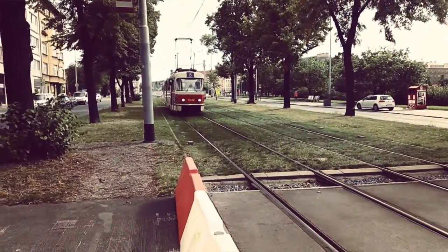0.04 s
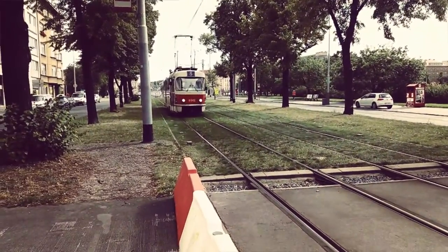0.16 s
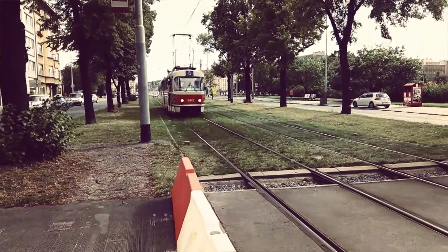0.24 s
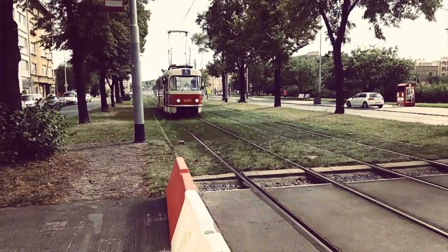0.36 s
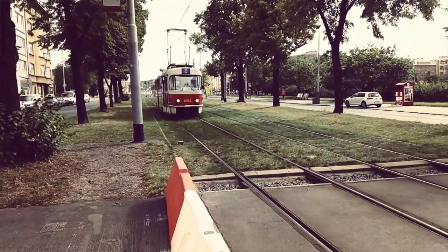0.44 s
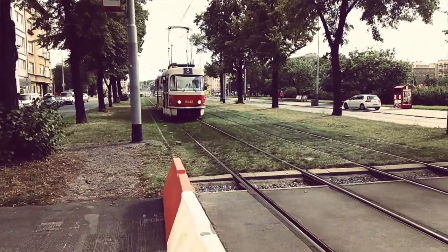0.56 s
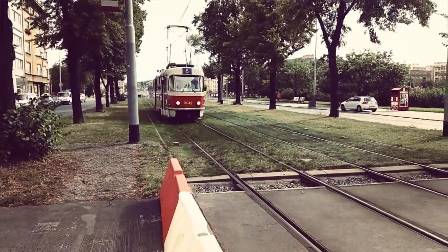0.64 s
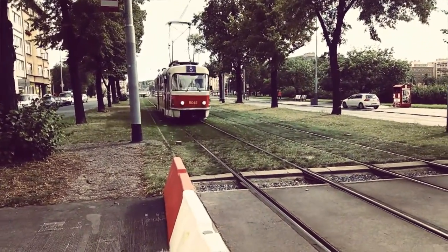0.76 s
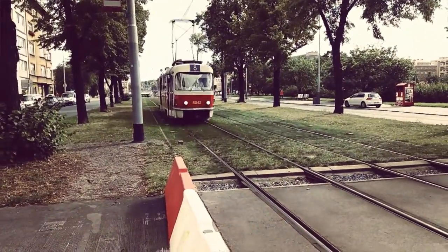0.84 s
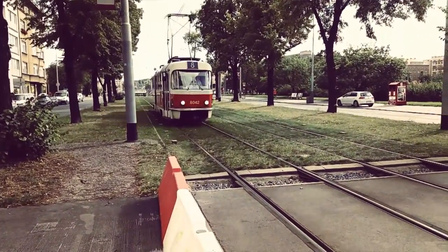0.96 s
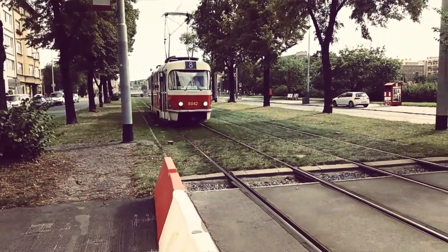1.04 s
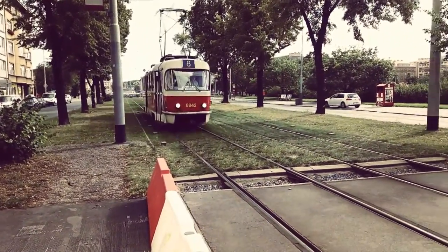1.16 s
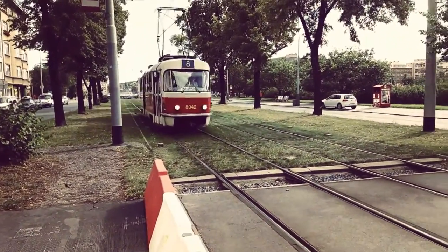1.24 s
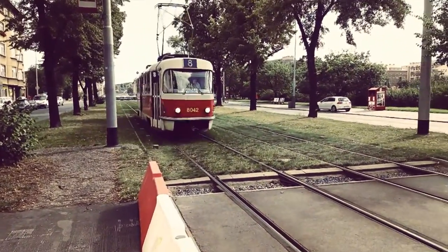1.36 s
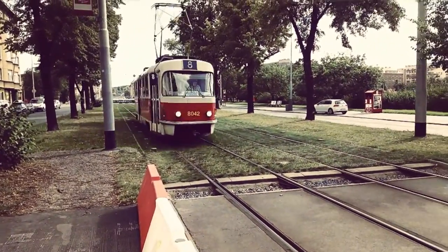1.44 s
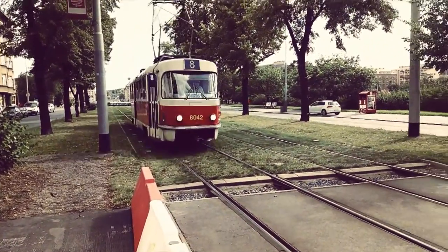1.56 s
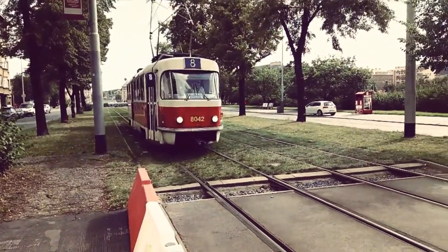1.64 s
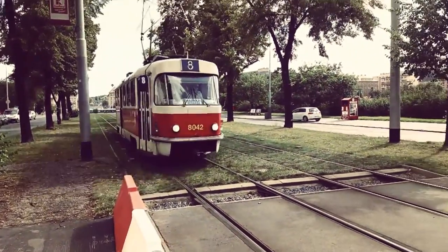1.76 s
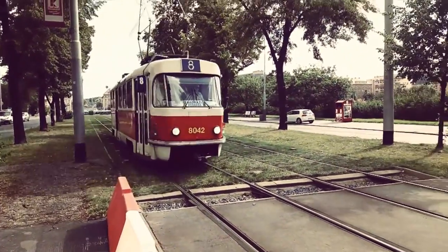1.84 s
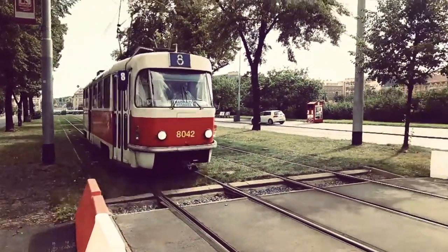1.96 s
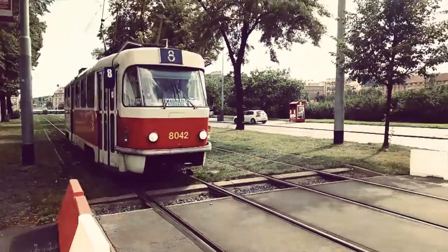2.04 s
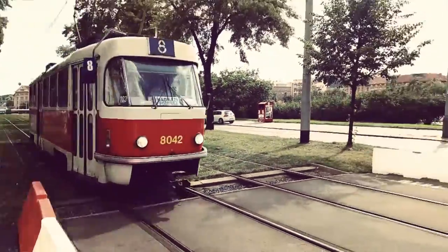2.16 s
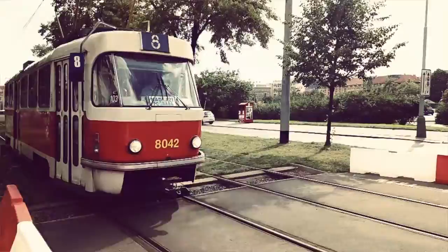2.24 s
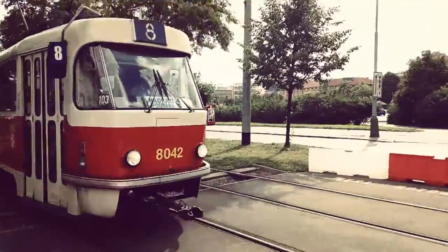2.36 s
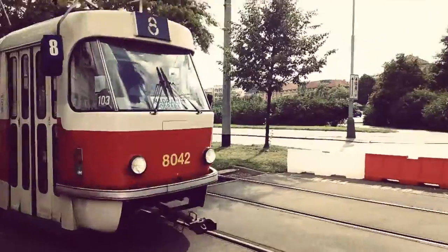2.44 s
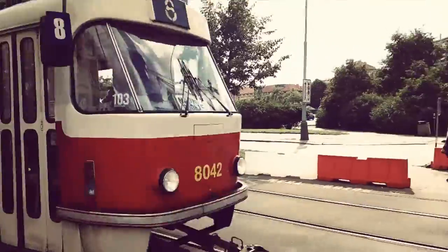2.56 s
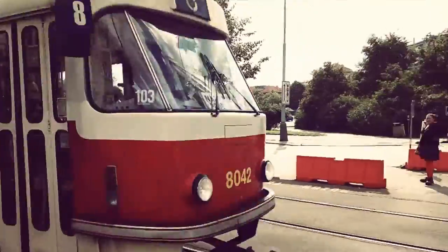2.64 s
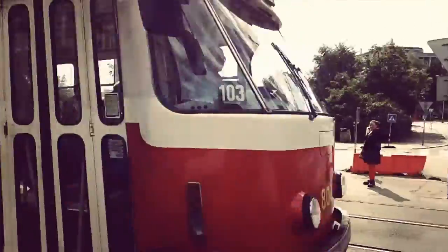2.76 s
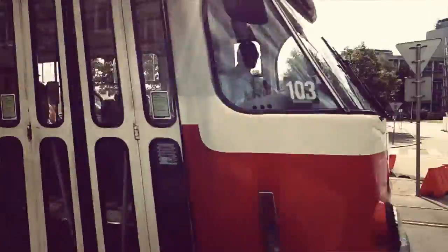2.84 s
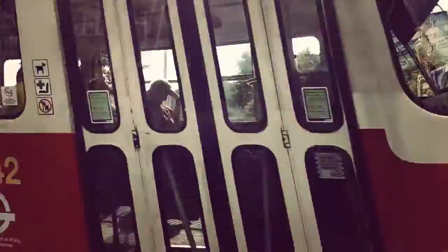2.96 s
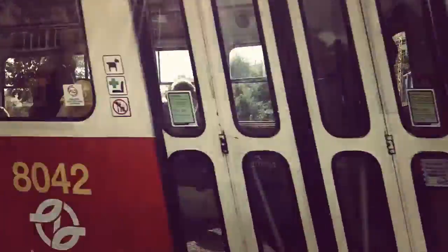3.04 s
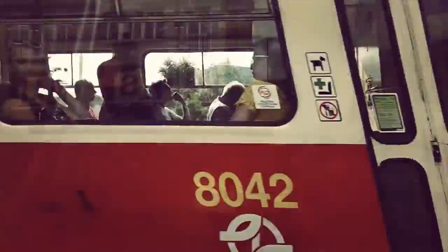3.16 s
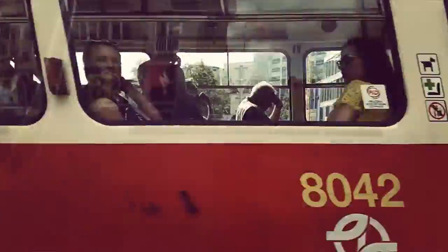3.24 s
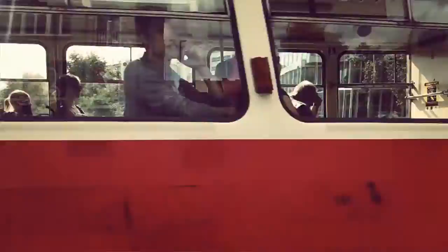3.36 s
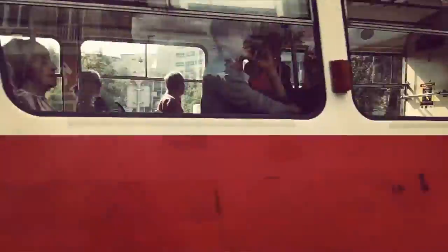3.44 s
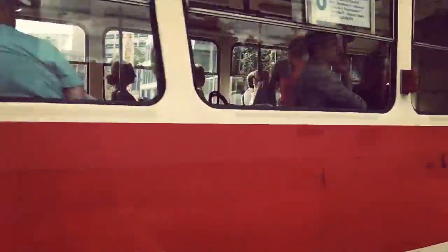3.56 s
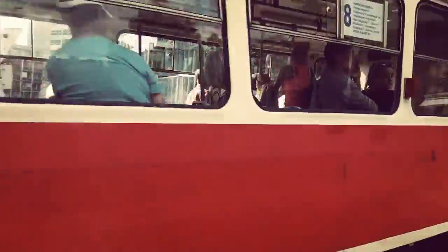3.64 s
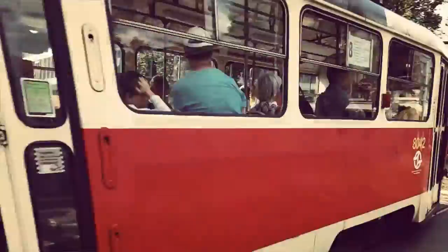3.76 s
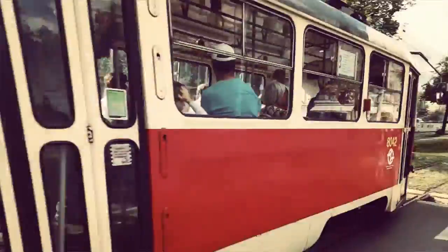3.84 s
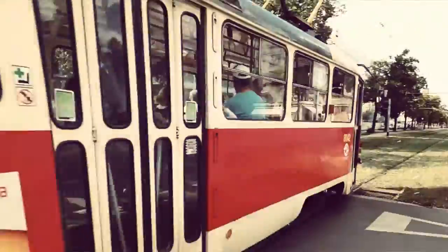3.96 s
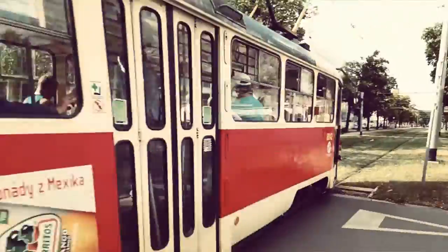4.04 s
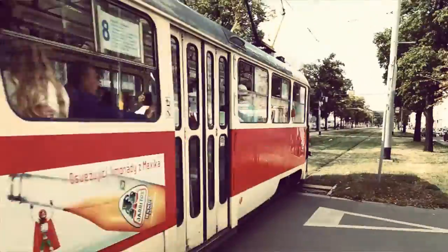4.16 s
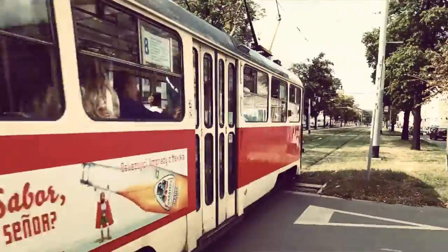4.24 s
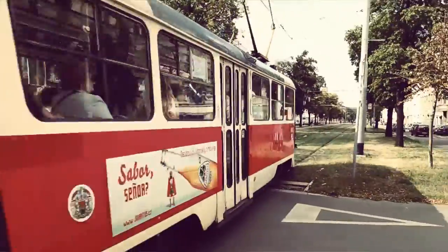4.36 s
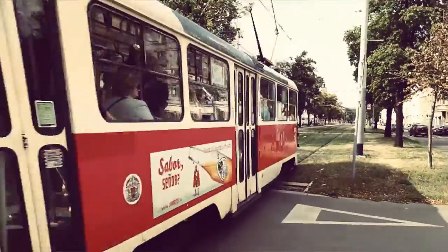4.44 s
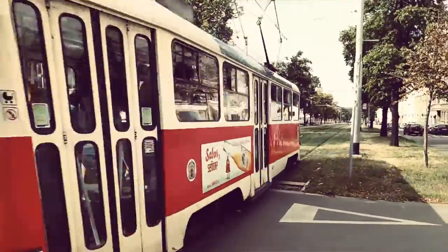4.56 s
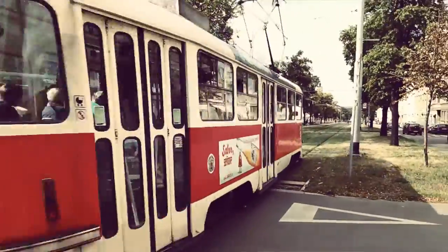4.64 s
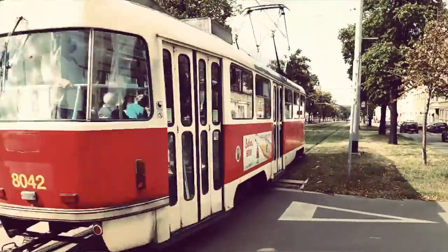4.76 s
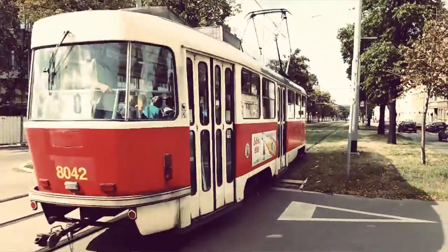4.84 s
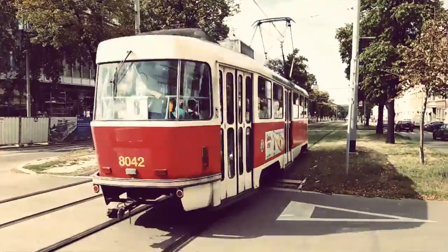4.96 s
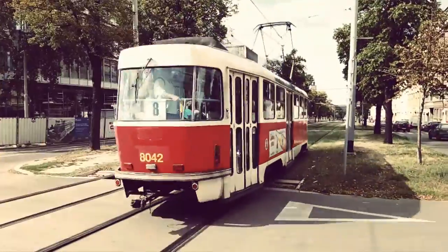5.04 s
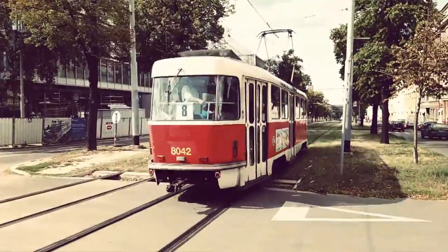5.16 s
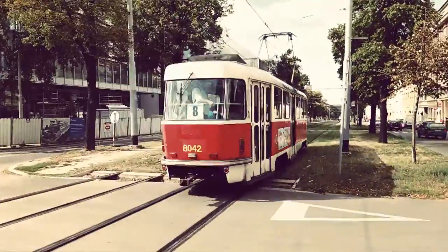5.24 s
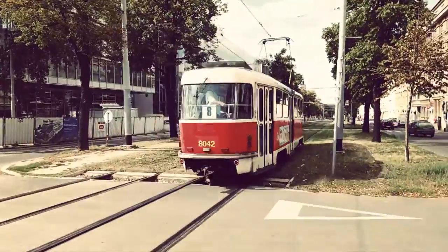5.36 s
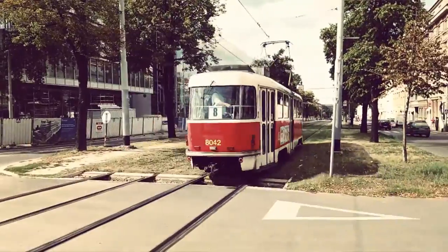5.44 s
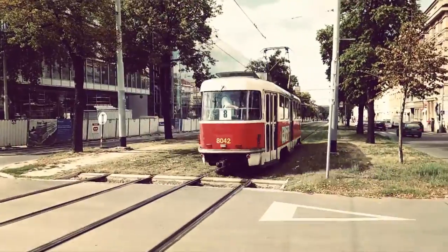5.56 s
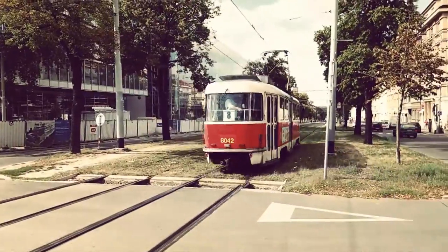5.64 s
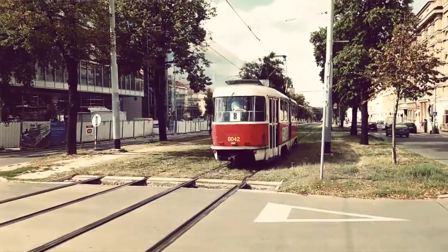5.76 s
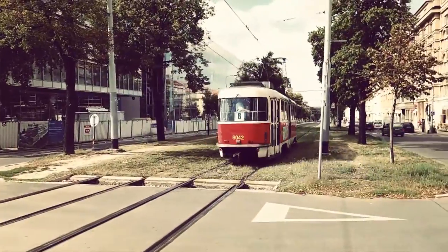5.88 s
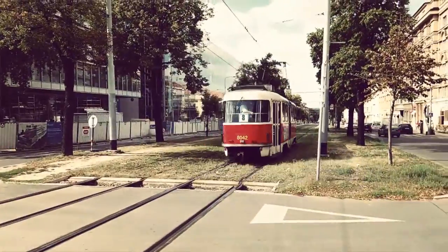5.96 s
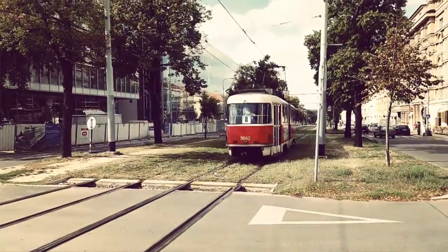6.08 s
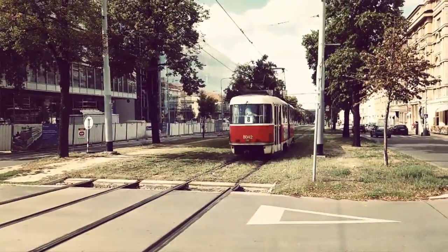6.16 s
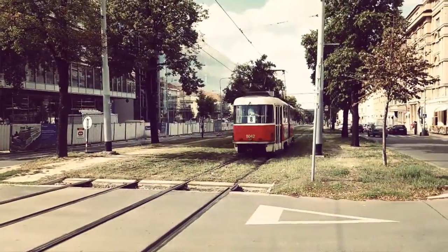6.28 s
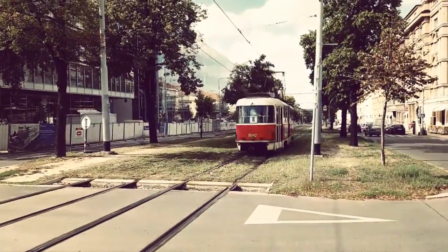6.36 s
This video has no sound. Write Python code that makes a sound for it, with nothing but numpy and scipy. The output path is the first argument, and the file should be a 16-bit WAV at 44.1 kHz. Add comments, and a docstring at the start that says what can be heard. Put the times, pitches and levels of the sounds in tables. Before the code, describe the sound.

Outdoors beside a street tram crossing, wind thumps a bare microphone over low street noise. A car's tyre hiss rises briefly and draws off. A tram emerges, becomes louder abruptly as it meets the paving, and passes very close with deep rumble, drumming slabs, wavering rail whine and thin wheel squeals. It rolls away, muffled by grass, under heavy wind buffeting.

```python
"""A tram rolls over a paved crossing right beside the microphone and away along grass track.
Noise drives the narrow ringing bands of its body, slabs, rails and wheels; coloured noise makes it roll.
Wind buffets the bare microphone in low thumps, built from short pressure swings.
A car fades on the street behind: tyre noise with a road echo, two rising bands and a tread hum.
Brief wheel squeals, a whine spot, broader hisses and steady street noise are random spectra."""
import sys
import numpy as np
from scipy import signal
from scipy.io import wavfile
from scipy.ndimage import uniform_filter1d

SR = 44100
rng = np.random.default_rng(int(sys.argv[2]) if len(sys.argv) > 2 else 0)


def file_out(sig):
    """Save sig as 16-bit WAV at sys.argv[1]."""
    # one column per channel
    cols = np.atleast_2d(sig).T
    # limit, then scale
    lim = np.clip(cols, -1, 1)
    pcm = np.round(lim * 32767).astype(np.int16)
    wavfile.write(sys.argv[1], SR, pcm)


def rack_gain(trim_db):
    """Turn a fader trim in dB into the linear factor to multiply a signal by."""
    fader = np.asarray(trim_db, float)
    return 10 ** (fader / 20)


N = 282725
TIME_S = np.arange(N) / SR

# Ringing of body, slabs and wheels, before any pitch shift: (frequency [Hz], width [Hz], level [dB])
BODY_MODES = [(127.5, 34, -4), (236, 65, 2), (344, 160, 0)]
SLAB_MODES = [(729.3, 245, 4.5), (870.3, 208, 5.5), (979, 32, -12.5), (1371, 180, -11)]
FRONT_WHEEL_MODES = [(3110, 220, -7), (4240, 200, -3), (4840, 160, -11), (5150, 150, -2), (6090, 130, -11)]
REAR_WHEEL_MODES = [(3185, 130, -3), (4450, 170, -13), (5460, 190, -5), (6600, 150, -12), (7660, 150, -22)]
# Ringing of the rails, all moved together by the wander below: (frequency [Hz], width [Hz], level [dB])
RAIL_MODES = [(1740, 79, 0.5), (1740, 206, -3), (1998, 170, -10.5), (2197, 470, -9)]
# The strongest rail mode wanders: (time [s], frequency [Hz])
WHINE_WANDER = [(2.3, 1775), (2.7, 1765), (3.0, 1725), (3.2, 1765), (3.36, 1690), (3.5, 1755), (3.62, 1730),
                (3.85, 1715), (4.0, 1710), (4.15, 1725), (4.35, 1749), (4.5, 1700), (4.85, 1715),
                (5.15, 1700), (5.6, 1685)]
# The rail sings out: (time [s], level change [dB], half length [s])
RAIL_SINGS = [(2.68, 1, 0.12), (3.205, 7, 0.033), (3.474, 3.5, 0.13), (4.144, 5.5, 0.035),
              (4.175, 6.5, 0.0048), (4.34, 5, 0.044), (4.832, 1.5, 0.031)]
# The whine sinks for a while: (time [s], level change [dB], half length [s])
WHINE_LULLS = [(2.048, -8.5, 0.44), (3.143, -4, 0.024), (4.167, -13, 0.007), (4.235, -6, 0.014),
               (4.707, -9, 0.021), (5.302, -0.5, 0.12), (2.3, -2, 0.1)]
# The rumble swells and dips: (time [s], level change [dB], half length [s])
RUMBLE_BOOMS = [(3.053, 3.5, 0.25), (4.08, 2, 0.055), (4.356, -5.5, 0.072), (4.68, 7, 0.12),
                (5.21, -2, 0.34)]
# Wheel ringing swells: (time [s], peak level [dB], rise [dB/s], fall [dB/s])
FRONT_WHEEL_SWELLS = [(3.17, -43, 23.5, 15.5), (4.3, -45.5, 29.5, 61), (1.2, -62, 22, 1.5)]
REAR_WHEEL_SWELLS = [(3.5, -42.5, 28, 4.4), (4.9, -52, 11, 21)]
# Colour of the rolling noise: (frequency [Hz], relative level per Hz [dB])
ROLLING_COLOUR = [(24, -51), (40, -29.5), (63, -13.5), (171, -4.5), (223, -0.5), (345, -1), (559, -12.5),
                  (844, -13.5), (1240, -14), (1550, -13.5), (1740, -5.5), (2830, -30), (6760, -36),
                  (13000, -69)]
# Front and rear bogie pass the microphone: one time each [s]
BOGIE_PASS_S = [3.573, 4.293]
# Loudness of each tram layer: (front bogie when nearest [dB], rear bogie when nearest [dB],
# loss per tenfold distance [dB], loss on the grass before [dB], loss on the grass after [dB])
TRAM_LAYERS = {"rumble": (-24, -17.5, 30.5, 14, 9), "slabs": (-27, -27.5, 15, 17.5, 28),
               "whine": (-21.5, -24, 33, 2, 15), "rolling": (-19, -21, 32, 4, 4.5)}
# Brief narrow wheel squeals near 4.5 and 6.6 kHz, a whine spot at 2 kHz, and broader hisses:
# (time [s], level [dB], half length [s], frequency [Hz], width [share of frequency])
SQUEALS_AND_HISSES = [(3.0, -50, 0.09, 4520, 0.018), (3.418, -50, 0.028, 8800, 0.17),
                      (3.41, -41.5, 0.06, 4500, 0.015), (3.6, -49, 0.06, 4400, 0.015),
                      (4.55, -51, 0.16, 4400, 0.018), (3.459, -41, 0.0092, 7430, 0.15),
                      (4.1, -48.5, 0.12, 4400, 0.03), (6.366, -53, 0.05, 4760, 0.28),
                      (6.305, -55, 0.015, 4700, 0.05), (3.365, -30, 0.025, 2035, 0.015),
                      (3.63, -50, 0.06, 6600, 0.012), (5.733, -62, 0.008, 6000, 0.15),
                      (5.06, -52, 0.008, 4000, 0.2)]
# Gusts: (time [s], buffeting level [dB])
GUSTS = [(0.0, -37), (0.21, -33.5), (0.61, -40.5), (1.25, -36.5), (1.6, -29), (1.9, -33.5), (3.0, -31.5),
         (4.2, -32), (4.96, -25), (5.3, -31.5), (6.07, -25), (6.27, -29), (6.41, -37)]
# Strong eddies on the microphone; the edge is the base level of the faster swirls, trimmed by their speed:
# (time [s], level [dB], frequency [Hz], sharp edge against the main swing [dB])
STRONG_EDDIES = [(0.306, -19.5, 117, -26), (0.348, -16, 197, -26), (1.1, -18.5, 203, -25),
                 (1.185, -18.5, 204, -32), (1.312, -16, 123, -32), (1.502, -17, 139, -33),
                 (1.513, -18, 176, -30), (1.756, -12.5, 221, -29), (1.772, -6.5, 164, -20),
                 (1.798, -9, 193, -23), (1.813, -13, 158, -27), (1.833, -14.5, 176, -38),
                 (2.146, -12.5, 139, -27), (2.167, -6.5, 286, -24), (2.175, -6, 178, -16),
                 (2.333, -8.5, 181, -33), (2.424, -15, 170, -35), (4.823, -7, 201, -37),
                 (5.322, -13.5, 170, -8), (5.371, -17, 199, -28), (5.457, -13.5, 125, -38),
                 (5.501, -12.5, 164, -30), (5.533, -17, 330, -5.5), (5.563, -12.5, 139, -11.5),
                 (5.662, -12, 148, -16), (5.775, -17.5, 134, -27), (5.907, -10.5, 195, -34),
                 (5.924, -10.5, 184, -31), (5.938, -11, 101, -21), (5.954, -10.5, 103, -8.5),
                 (5.973, -11, 101, -39), (5.99, -3, 163, -34), (6.008, -5.5, 194, -12.5),
                 (6.023, -9.5, 142, -36), (6.035, -11, 151, -35), (6.044, -8, 172, -12),
                 (6.063, -6.5, 253, -5), (6.069, -15, 119, -9), (6.125, -15, 144, -46),
                 (6.212, -10.5, 180, -9), (6.226, -10, 142, -37), (6.259, -11.5, 198, -39)]
# Colour of the car's tyre noise: (frequency [Hz], relative level per Hz [dB])
TYRE_COLOUR = [(180, -33), (300, 1.5), (393, -9), (494, -3), (545, -9.5), (594, -9.5), (1110, -5.5),
               (1480, -10.5), (2840, -20), (4000, -26.5), (9000, -44), (11700, -52), (19800, -120)]
# Colour of the street noise: (frequency [Hz], relative level per Hz [dB])
STREET_COLOUR = [(18, -53), (30, -26.5), (93, -27), (130, -4.5), (244, -7.5), (445, -30.5), (564, -18),
                 (904, -31), (1490, -31), (1790, -24.5), (2600, -35), (5230, -54.5), (8000, -59.5),
                 (15700, -65)]
# Loudness of the street noise: (time [s], level [dB])
STREET_LEVEL = [(0, -37), (2.501, -34.5), (5.6, -32), (6.25, -32.5), (6.41, -32)]

SPEED_M_S, SOUND_M_S = 6.6, 343
TRACK_M = 2.814  # nearest distance to the rails
ON_SLABS_S, ON_EDGE_S = 2.56, .015  # the first wheels meet the paving abruptly
OFF_SLABS_S, OFF_EDGE_S = 5.62, .056  # the tram runs back on to grass


def tram():
    """Rumble, slabs, rails, wheels and rolling of one passing tram."""
    ahead_m = SPEED_M_S * (3.85 - TIME_S)  # along the track to the middle of the tram
    # Doppler shift, spread by the tram's length
    pitch = .997 + SPEED_M_S / SOUND_M_S * ahead_m / np.hypot(ahead_m, 5)
    fade_in = np.clip((TIME_S - .7) / 0.7, 0, 1)  # emerges from the street noise
    return fade_in * (rumble(pitch) + slabs(pitch) + rail_whine() + wheels(pitch) + rolling())


def rumble(pitch):
    """The tram's body rings in low bands that swell and dip."""
    gain = passing("rumble") * rack_gain(bumps_db(TIME_S, RUMBLE_BOOMS))
    return gain * ringing(BODY_MODES, pitch, 2.96)


def slabs(pitch):
    """The paving slabs drum; this thins and drops in pitch once the last wheels near the grass."""
    fade_db = -6 * step(TIME_S, 5.27, 0.072)
    sag = 1 - 0.11 * step(TIME_S, 5.15, .12)
    return passing("slabs") * rack_gain(fade_db) * ringing(SLAB_MODES, pitch * sag, 2.6)


def rail_whine():
    """Rails ring in bands that wander together, singing out and sinking."""
    shimmer_db = bumps_db(TIME_S, RAIL_SINGS + WHINE_LULLS)
    wander = along(WHINE_WANDER, TIME_S)[0] / RAIL_MODES[0][0]
    return passing("whine") * rack_gain(shimmer_db) * ringing(RAIL_MODES, wander, 2.0)


def wheels(pitch):
    """Front and rear wheels ring in high bands, softer once the tram is back on grass."""
    front, rear = (np.sqrt(sum(rack_gain(swell_db(TIME_S, *row)) ** 2 for row in rows))
                   for rows in (FRONT_WHEEL_SWELLS, REAR_WHEEL_SWELLS))
    rings = front * ringing(FRONT_WHEEL_MODES, pitch, 2.2) + rear * ringing(REAR_WHEEL_MODES, pitch, 2.0)
    return rack_gain(-12 * step(TIME_S, OFF_SLABS_S, .11)) * rings


def rolling():
    """Rolling makes a broad coloured noise that follows the bogies past."""
    return passing("rolling") * hiss(ROLLING_COLOUR, patchy_db=2.0)


def passing(layer):
    """Gain of a tram layer: both bogies fade with distance, and grass muffles the track."""
    front_db, rear_db, loss_db, before_db, after_db = TRAM_LAYERS[layer]
    power = 0
    for pass_s, near_db in zip(BOGIE_PASS_S, (front_db, rear_db)):
        distance = np.hypot(1, SPEED_M_S * (TIME_S - pass_s) / TRACK_M)  # 1 when nearest
        power = power + rack_gain(near_db - loss_db * np.log10(distance)) ** 2
    grass_before_db = before_db * step(-TIME_S, -ON_SLABS_S, ON_EDGE_S)
    grass_after_db = after_db * step(TIME_S, OFF_SLABS_S, OFF_EDGE_S)
    return np.sqrt(power) * rack_gain(-grass_before_db - grass_after_db)


def ringing(modes, pitch, flicker_db=0.):
    """Rough contact, as noise, drives each mode; pitch shifts them all alike; rms 1."""
    out = np.zeros(N)
    for hz, width, db in modes:
        r = np.exp(-np.pi * width / SR)
        push = rng.standard_normal(N) + 1j * rng.standard_normal(N)
        slow = signal.lfilter([1], np.convolve([1, -r], [1, -r]), push)
        drift = uniform_filter1d(rng.standard_normal(N), size=2200)
        patch = evened(uniform_filter1d(drift, size=2200))  # contact comes and goes
        tone = np.exp(2j * np.pi * hz * np.cumsum(pitch) / SR)  # lifts the slow noise to its pitch
        out += rack_gain(db) * evened(rack_gain(flicker_db * patch) * (slow * tone).real)
    return evened(out)


def squeals_and_hisses():
    """Narrow wheel squeals, a whine spot and broader hisses: brief noise, each in its own band."""
    def shape_db(hz, t):
        power = 0
        for s, db, half, f, share in SQUEALS_AND_HISSES:
            bump = np.exp(-((t - s) / half) ** 2 - (np.log((hz + 1) / f) / share) ** 2)
            power = power + rack_gain(2 * db) / share * bump * 12000 / f  # narrow bands get more per Hz
        return 10 * np.log10(power + 1e-16)
    return hiss([(20, 0.0034), (20000, 0.012)], shape_db, patchy_db=4.0)


def wind():
    """Wind pushes on the microphone in many small random eddies that follow the gusts, and strong ones."""
    small, strong = np.zeros(N), np.zeros(N + 3000)
    for hz in np.geomspace(70, 260, num=8):
        starts = rng.random(N) < 30 / SR  # about 30 a second
        sizes = rack_gain(3.5 * np.minimum(rng.exponential(1, N), 2.2)) * starts
        small += signal.oaconvolve(sizes, eddy(hz, 2 * np.pi * rng.random(), cycles=0.8), "same")
    phases = rng.uniform(-0.86, 1, (len(STRONG_EDDIES), 2))
    for (s, db, hz, edge_db), (phase, edge_phase) in zip(STRONG_EDDIES, phases):
        swirl = eddy(hz, phase, cycles=0.44)
        for up in (1.9, 2.9):  # smaller, faster swirls on top
            faster = eddy(up * max(hz, 200), np.pi * edge_phase * up, cycles=2.0, fall=0.12)
            swirl += rack_gain(edge_db - 7.9 * up + 13.5) * faster
        strong[round(s * SR):][:3000] += rack_gain(db) * swirl
    return rack_gain(along(GUSTS, TIME_S)[0]) * evened(small) + strong[1500:N + 1500]


def eddy(hz, phase, cycles, fall=0.39):
    """A short pressure swing that starts fast and slows down."""
    turns = np.arange(-1500, 1500) / SR * hz
    spread = np.where(turns < 0, 0.67 * cycles, 1.25 * cycles)  # quicker rise than decay
    swing = np.cos(2 * np.pi * (turns - fall * turns * np.tanh(turns)) + phase)
    return np.exp(-.5 * (turns / spread) ** 2) * swing


def car():
    """Tyre noise, its two rising bands and the tread hum of a car drawing off on the street behind."""
    tyres = hiss(TYRE_COLOUR, tyre_shape_db, patchy_db=1.54)
    return tyres + lower_echo_band() + upper_echo_band() + tread_hum()


def tyre_shape_db(hz, t):
    """As the car draws off its road echo lags less, so the comb climbs; a notch lingers near 3.4 kHz."""
    level_db = swell_db(t, 0.8, -36.5, rise=4, fall=2.5) - 6.5 * step(t, 2.2, 0.24)
    first_ms, last_ms = .98, .47  # echo lag at first and at last
    lag_ms = first_ms + (last_ms - first_ms) * step(t, 1.16, .08)
    echo = .75 * np.exp(-((t - 1.2) / .3) ** 2)  # strongest at 1.2 s
    waves = (hz + 1) * lag_ms / 1000  # wavelengths in the lag
    # a rough road blurs the echo at short wavelengths; it fades at long ones too
    echo = echo / (1 + (1.3 / waves) ** 8) / (1 + (waves / 2.8) ** 12)
    comb_db = 20 * np.log10(abs(1 + echo * np.exp(2j * np.pi * waves)))
    # the echo's notch lingers near 3.4 kHz, later growing shallower
    notch_db = 20 * (step(t, 1.38, 0.11) - .4 * step(t, 2.9, .12))
    return level_db + comb_db - notch_db * np.exp(-.5 * (np.log((hz + 1) / 3400) / 0.12) ** 2)


def lower_echo_band():
    """A band of the car's tyre noise, brightened by its road echo, rises in pitch and settles."""
    band_hz = 0.95 * (1250 + (1830 - 1250) * step(TIME_S, 1.22, .045))
    level_db = swell_db(TIME_S, 1.3, -45, rise=35, fall=5)
    return rack_gain(level_db) * ringing([(1, 360, 0)], band_hz, 1.5)  # 360 Hz wide


def upper_echo_band():
    """A second, higher band of the tyre noise, brightened by the road echo, rises in pitch once."""
    band_hz = 0.96 * (2300 + (4300 - 2300) * step(TIME_S, 1.22, .08))
    level_db = swell_db(TIME_S, 1.17, -50.5, rise=30, fall=55)
    return rack_gain(level_db) * ringing([(1, 1100, 0)], band_hz, 1.7)  # 1100 Hz wide


def tread_hum():
    """The tread hums in one band of noise, highest in pitch when loudest."""
    top_db = -43.5
    level_db = swell_db(TIME_S, 1.25, top_db, rise=16.5, fall=10)
    hum_hz = 0.99 * (1197 + 11 * (level_db - top_db))
    return rack_gain(level_db) * step(-TIME_S, -1.93, .05) * ringing([(1, 194, 0)], hum_hz)


def street():
    """Coloured noise of the street, its level slowly changing."""
    return hiss(STREET_COLOUR, lambda hz, t: along(STREET_LEVEL, t)[0], patchy_db=2.2)


def hiss(spectrum, shape_db=lambda hz, t: 0, patchy_db=1.5):
    """Random short-time spectra of a given colour with drifting patches; rms 1 before shape_db."""
    frames, hz = N // 256 + 5, np.fft.rfftfreq(1024, 1 / SR)[:, None]
    a, b, patches = rng.standard_normal((frames, 513, 3)).T
    patches = uniform_filter1d(patches, size=10, axis=0)  # smooth over pitch, then over time
    patches = evened(uniform_filter1d(patches, size=12, axis=1))
    f, db = np.transpose(spectrum)
    colour_db = np.interp(np.log(hz + 1), np.log(f), db)
    z = (a + 1j * b) * rack_gain(colour_db + patchy_db * patches)
    shape = rack_gain(shape_db(hz, np.arange(frames) * 256 / SR))
    plain = signal.istft(z, nperseg=1024, noverlap=768)[1][:N]
    shaped = signal.istft(z * shape, nperseg=1024, noverlap=768)[1][:N]
    return shaped / np.sqrt(np.mean(plain ** 2))


def evened(x):
    """Scales to rms 1."""
    return x / np.sqrt(np.mean(x ** 2) + 1e-20)


def along(rows, t):
    """Each column of a table, read at the times t."""
    s, *columns = np.transpose(rows)
    return [np.interp(t, s, c) for c in columns]


def step(t, at_s, span_s):
    """A soft switch from 0 to 1."""
    return .5 + .5 * np.tanh((t - at_s) / (2 * span_s))


def swell_db(t, at_s, top_db, rise, fall):
    """Climbs and sinks by so many dB a second around a peak."""
    return top_db - np.where(t < at_s, rise * (at_s - t), fall * (t - at_s))


def bumps_db(t, rows):
    """Short swells and dips of level."""
    return sum(db * np.exp(-((t - s) / half) ** 2) for s, db, half in rows)


def scene():
    """All sources at one microphone."""
    return (tram() + squeals_and_hisses() + wind() + car() + street())[None]


def top_cut(x):
    """Nothing passes above the cut-off."""
    return signal.sosfilt(signal.butter(12, 15890, fs=SR, output="sos"), x)


def record(dry):
    """The microphone cuts the deep bass steeply and rounds off the highest peaks."""
    cut = signal.sosfilt(signal.butter(5, 53, "highpass", fs=SR, output="sos"), dry)
    rounded = cut / (1 + (abs(cut) / .8) ** 4) ** (1 / 4)
    return top_cut(rounded)


dry = scene()
out = record(dry)
file_out(out)
```